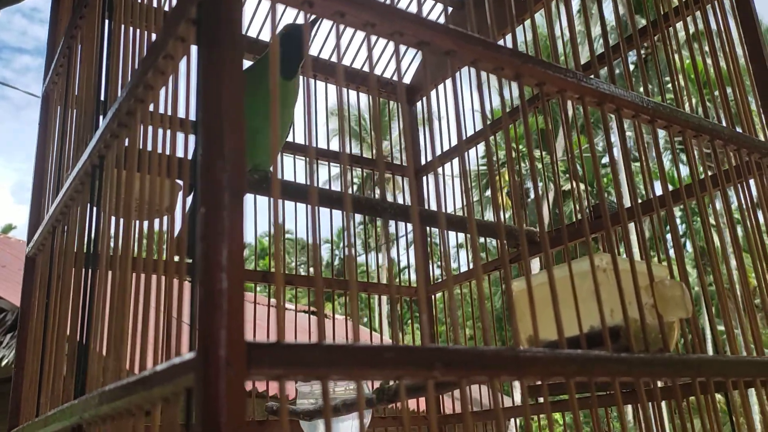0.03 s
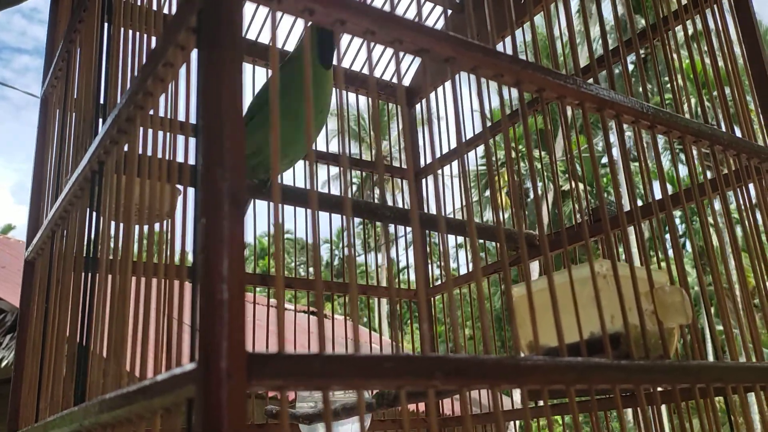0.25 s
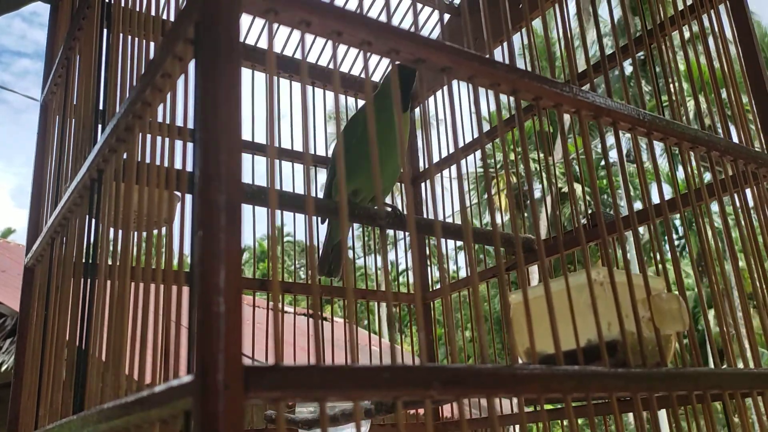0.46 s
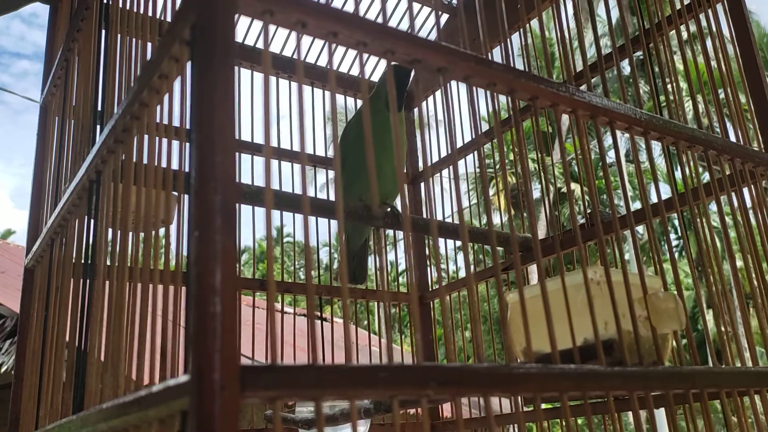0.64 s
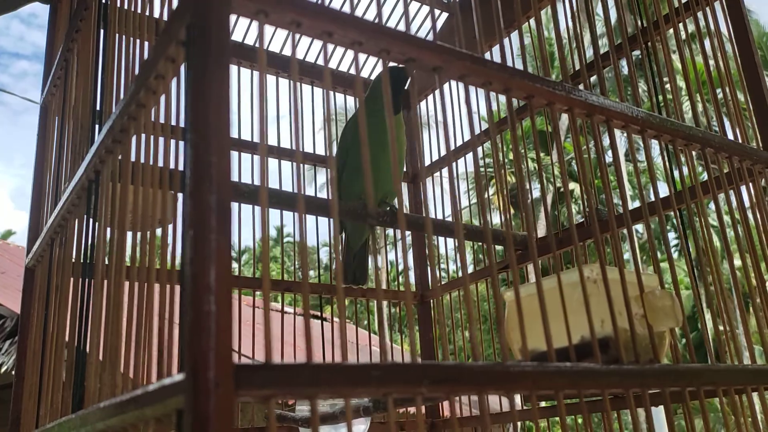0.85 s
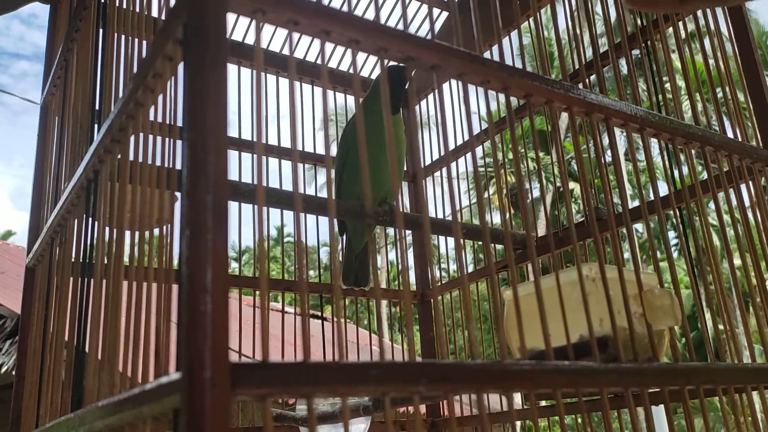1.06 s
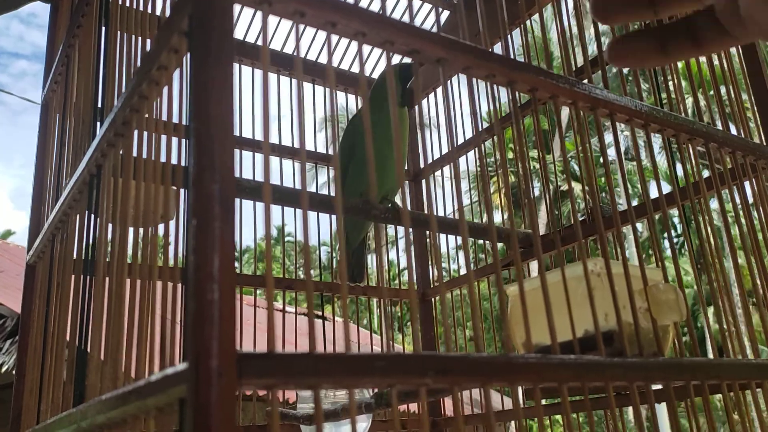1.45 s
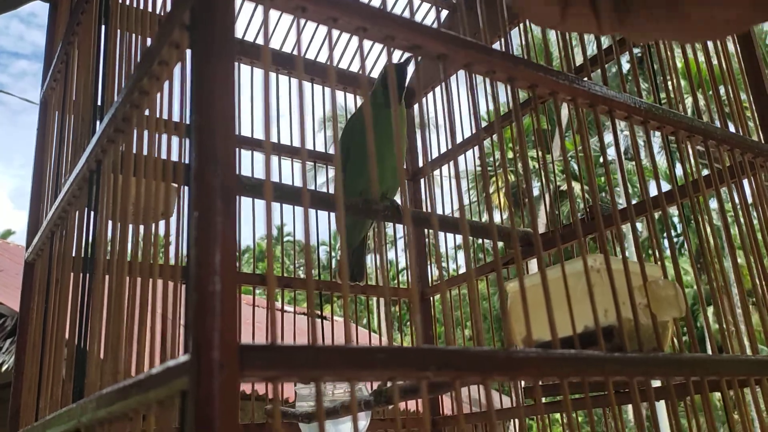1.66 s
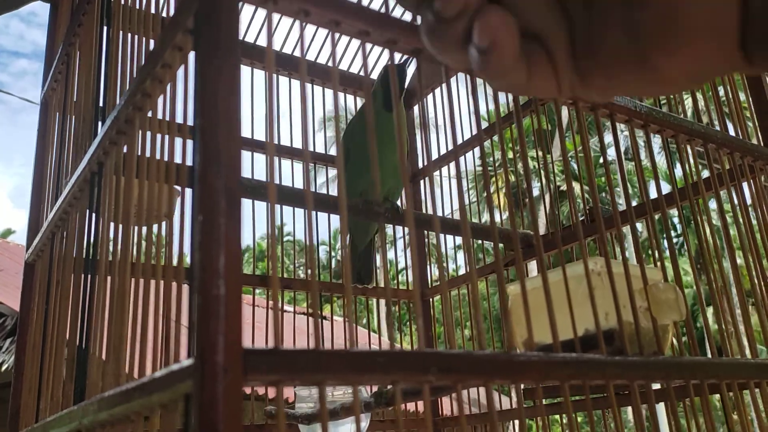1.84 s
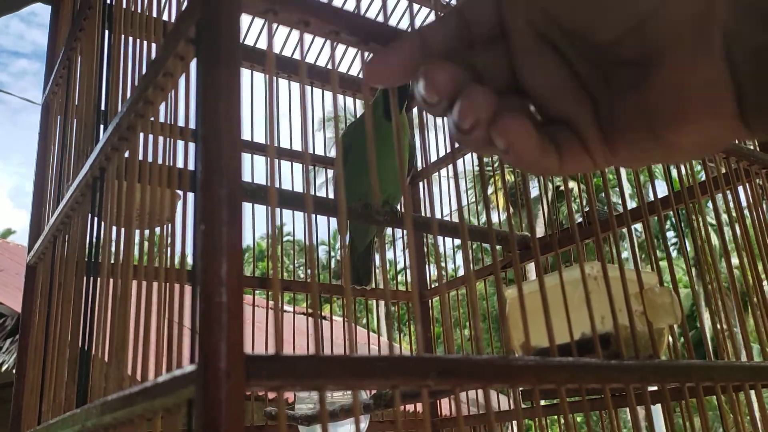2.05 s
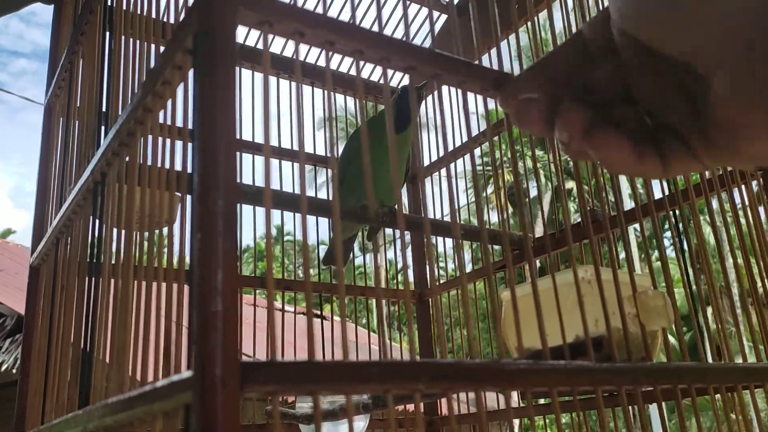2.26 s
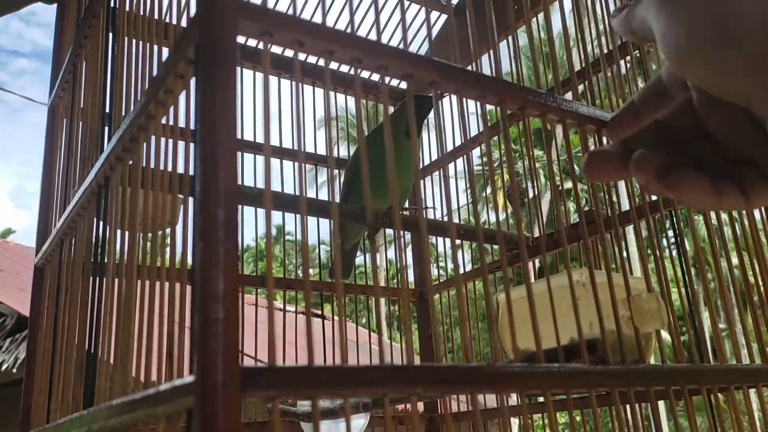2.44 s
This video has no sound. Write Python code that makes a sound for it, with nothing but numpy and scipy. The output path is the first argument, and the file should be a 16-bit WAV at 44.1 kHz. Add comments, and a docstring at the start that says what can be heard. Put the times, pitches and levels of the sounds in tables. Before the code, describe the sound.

A caged songbird close by gives four loud, whistled, slightly distorted squawks between 0.2 and 0.9 seconds. Two more follow until 1.4 seconds, the first softer, under a fast high trill. A thin echo and faint distant chirps last until 1.8 seconds, then comes a short buzzy note. A few dry flaps or snaps sound around 2.2 seconds. Soft outdoor hiss and a low motor hum lie underneath.

```python
"""A caged songbird outdoors gives six loud, close squawks, the last two under a fast high trill.
Each is a nearly pure whistle with rasp at pitch leaps and a rough, high edge of overload distortion
at its peak. A beak click falls among them. A thin lingering echo and faint distant chirps follow,
then a buzzy note and a few dry flaps or snaps.
The yard throws the notes back over a low motor hum and hiss; a limiter holds the loudest notes."""
import sys
import numpy as np
from scipy import signal
from scipy.fft import rfft, irfft
from scipy.io import wavfile
from scipy.ndimage import uniform_filter1d, minimum_filter1d

SR = 44100
rng = np.random.default_rng(int(sys.argv[2]) if len(sys.argv) > 2 else 0)


def wrap_up_sound(samples):
    """Save the sound to the file named by the first command line argument, as 16-bit audio."""
    columns = np.atleast_2d(samples).T
    # keep every value between -1 and 1, then stretch to whole-number steps
    tamed = np.clip(columns, -1, 1)
    steps = np.round(tamed * 32767).astype(np.int16)
    wavfile.write(sys.argv[1], SR, steps)


N = 110250

# One curve per squawk. Each row: time in seconds, pitch in Hz, level in dB.
SQUAWK_1 = [(0.201, 1595, -34.5), (0.215, 1644, -20), (0.234, 1764, -22.5), (0.239, 1992, -5),
            (0.243, 2357, -9.5), (0.26, 2311, -0.5), (0.282, 2313, 4.5), (0.295, 2302, -19),
            (0.307, 2370, -21)]
SQUAWK_2 = [(0.403, 1792, -33.5), (0.423, 1633, -35), (0.434, 1903, -15.5), (0.44, 2000, -12),
            (0.446, 2484, -3.5), (0.453, 2509, -18), (0.468, 2415, -15), (0.474, 2445, 1),
            (0.495, 2453, -21.5)]
SQUAWK_3 = [(0.557, 1658, -39.5), (0.572, 1803, -27.5), (0.583, 2080, -8.5), (0.595, 2403, -12),
            (0.604, 2478, -1), (0.633, 2393, -11), (0.665, 2256, -6), (0.679, 2252, -21),
            (0.696, 2104, -22)]
SQUAWK_4 = [(0.777, 1977, -31), (0.793, 2232, -15), (0.802, 2267, -4.5), (0.818, 2317, -0.5),
            (0.851, 2388, -3.5), (0.876, 2387, -1), (0.893, 2356, 3.5), (0.91, 2310, -9),
            (0.917, 2170, -25.5)]
SQUAWK_5 = [(1.009, 1555, -34), (1.025, 1591, -21), (1.06, 1551, -15.5), (1.081, 1595, -14.5),
            (1.101, 1662, -33), (1.134, 1701, -16), (1.151, 1660, -33)]
SQUAWK_6 = [(1.27, 2114, -36.5), (1.287, 2187, -17), (1.301, 2236, -8.5), (1.325, 2252, -6.5),
            (1.344, 2253, -2.5), (1.364, 2252, -21), (1.378, 2278, -20.5)]
# Tone per squawk. Each row: distortion and rasp gain in dB, right-channel lag in seconds,
# pan in dB (always left minus right), yard send in relative dB.
SQUAWK_TONES = [(8.5, .00007, 5.5, -3.5), (4.5, -.00007, 5.5, 6.5), (1.5, -.00003, 7.5, 3),
                (0.5, 0.011, 10.5, -3), (-10.5, .00026, 3, -3), (-0.5, -.00018, 12.5, 1.5)]
# Overload distortion. Each row: frequency in Hz, left and right gain in dB.
OVERLOAD_SPECTRUM = [(3400, -32.5, -27.5), (5930, -51.5, -45), (7090, -60, -39), (9600, -45.5, -53),
                     (12200, -38, -52.5), (13700, -29, -48)]
# Rasp. Each row: frequency in Hz, relative level in dB.
RASP_SPECTRUM = [(1000, -33), (2750, 7.5), (3500, -16.5), (8500, -26.5), (13500, -11.5)]
# Trill. Each row: start and length in seconds, top pitch and plunge depth in Hz, level in dB.
TRILL_NOTES = [(0.956, 0.022, 5330, 498, -29.5), (1.016, 0.027, 5815, 1840, -28.5),
               (1.076, .037, 5850, 1620, -26.5), (1.146, 0.042, 5870, 1930, -28.5),
               (1.21, .036, 6070, 2200, -26.5), (1.265, 0.051, 6110, 2720, -29.5),
               (1.327, 0.029, 6090, 1430, -26.5)]
# Buzzes. Each row: start and length in seconds, first and last pitch in Hz, warble depth in Hz,
# level and pan in dB.
BUZZ_NOTES = [(0.881, 0.028, 4420, 4440, 300, -37.5, -8), (1.863, 0.106, 6060, 6035, 88.5, -36.5, -9.5)]
# Sliding tones. Each row: start and length in seconds, first and last pitch in Hz, level in dB.
UNDERTONE_GLIDES = [(0.284, 0.05, 2105, 1820, -26), (0.608, .078, 2227, 1903, -20)]
RING_AND_CHIRPS = [(0.001, 0.033, 5530, 5330, -47), (0.819, 0.012, 3095, 3440, -24),
                   (0.837, 0.014, 3250, 3240, -46), (1.956, 0.0093, 6295, 5710, -31.5),
                   (1.969, 0.0094, 4330, 3780, -33)]
ECHO_AND_FAR_CHIRPS = [(1.479, 0.19, 4610, 4410, -51), (1.633, 0.012, 2210, 2470, -30.5),
                       (1.643, 0.0066, 2750, 2950, -35.5), (1.659, 0.023, 1413, 1300, -37.5),
                       (1.71, 0.0086, 2310, 2430, -32), (1.737, 0.028, 1430, 1410, -36.5),
                       (1.792, 0.012, 2345, 2770, -34)]
# A beak click, then snaps. Each row: start and length in seconds (decay starts halfway), level in dB.
DRY_SNAPS = [(.538, .003, -37), (2.164, 0.004, -32), (2.214, 0.0064, -28.5), (2.2495, 0.0091, -23.5),
             (2.287, 0.016, -25), (2.321, .004, -34)]
# Their spectrum. Each row: frequency in Hz, relative level in dB.
SNAP_SPECTRUM = [(300, -5), (700, -1), (2200, 4), (6500, -1.5), (9000, -11), (13500, -1.5)]
# Low bump. One row: length in seconds, first and last pitch in Hz, level in dB.
BUMP_GLIDE = (.035, 300.5, 265, -39.5)
# Roof and near walls. Each row: delay in seconds, left and right gain in dB.
REFLECTIONS = [(.0105, -22, -14), (.045, -25, -18)]
# Rumble and hiss. Each row: frequency in Hz, relative density in dB.
AIR_SPECTRUM = [(25, -37), (55, -17), (118, -4.5), (330, -9.5), (709, -16), (1500, -14), (4500, -20.5),
                (10000, -36.5), (13500, -32)]
# Their width. Each row: frequency in Hz, left-right coherence from 0 to 1.
AIR_COHERENCE = [(150, 0.97), (700, 0.26), (4000, 0)]
# Their balance. Each row: frequency in Hz, pan in dB.
AIR_PAN = [(500, 0.5), (5000, -8.5), (14000, 1.5)]
# Motor hum. Each row: frequency in Hz, level before the swell in dB.
MOTOR_TONES = [(118.4, -57)]
# Its swell. Each row: time in seconds, gain in dB.
MOTOR_SWELL = [(.9, -19.5), (1.6, 7)]

JITTER_DEPTH, JITTER_HZ = 0.0055, 358
BAND_LIMIT_HZ = 14400


def squawks(fade_s=0.0054, leap_hz_per_s=21000, rasp_db=-46.5):
    """Nearly pure whistles. Returns notes, rough edge (distortion, rasp) and mono yard send."""
    notes, edge, rasp_envelope = np.zeros((3, 2, N))
    thrown = np.zeros((1, N))
    curves = [SQUAWK_1, SQUAWK_2, SQUAWK_3, SQUAWK_4, SQUAWK_5, SQUAWK_6]
    for curve, (edge_db, lag_s, pan_db, send_db) in zip(curves, SQUAWK_TONES):
        t = np.arange(curve[0][0] - fade_s, curve[-1][0] + fade_s, 1 / SR)
        hz = uniform_filter1d(along(curve, t), size=120)
        level_db = along(curve, t, axis=2)
        gate = np.clip(np.minimum(t - t[0], t[-1] - t) / fade_s, 0, 1)
        phase = phase_of(hz) - 2 * np.pi * hz * np.array([[0], [lag_s]])
        note = np.sqrt(2) * gate * amp(level_db) * np.sin(phase)
        add(notes, t[0], pan(pan_db) * note)
        add(thrown, t[0], amp(send_db) * note[:1])
        sag_db = 0.21 * np.minimum(level_db - np.percentile(level_db, 70), 0)
        leap = abs(np.gradient(hz)) * SR / leap_hz_per_s
        add(edge, t[0], gate * overload(hz, phase, edge_db, sag_db, leap))
        add(rasp_envelope, t[0], pan(0) * gate * amp(edge_db + 2 * sag_db) * (1 + 2 * np.sqrt(leap)))
    notes += undertones()
    rasp = coloured(rasp_envelope * rng.standard_normal((2, N)), RASP_SPECTRUM)
    return notes, edge + amp(rasp_db) * rasp, thrown


def overload(hz, phase, gain_db, sag_db, leap, flutter_db=3.5, flutter_hz=109, blur_rad=0.5):
    """Distortion as wavering harmonics 2-8. Off the note's peak they sink, the high ones fastest."""
    out = np.zeros_like(phase)
    for k in range(2, 9):
        colour = amp([across(OVERLOAD_SPECTRUM, k * hz, axis=side) for side in (1, 2)])
        colour *= k * hz < BAND_LIMIT_HZ
        level_db = gain_db + k * sag_db + flutter_db * wander(len(hz), flutter_hz)
        harmonic = np.sin(k * phase + blur_rad * wander(len(hz), JITTER_HZ))
        out += amp(level_db) / np.sqrt(2 + leap) * colour * harmonic
    return out


def undertones():
    """The other side of the syrinx slides down under the note."""
    return glides(UNDERTONE_GLIDES, pan_db=0, octave_db=-36)


def trill(hook_hz=1190, hook_s=0.0035, plunge_s=0.0022, waver_depth_hz=45):
    """Fast high notes, each an upward hook, a held top and a plunge."""
    out = np.zeros((2, N))
    for start_s, length_s, top_hz, plunge_hz, db in TRILL_NOTES:
        t = np.arange(0, length_s, 1 / SR)
        hz = top_hz - hook_hz * np.exp(-t / hook_s) - plunge_hz * np.exp((t - length_s) / plunge_s)
        hz += waver_depth_hz * wander(len(t), 210)
        add(out, start_s, peep(hz, db, pan_db=-11.5, octave_db=-22.5, taper=0.44))
    return out


def buzzes(warble_hz=114):
    """Notes roughened by a fast, uneven pitch warble."""
    out = np.zeros((2, N))
    for start_s, length_s, from_hz, to_hz, depth_hz, db, pan_db in BUZZ_NOTES:
        t = np.arange(0, length_s, 1 / SR)
        warble = np.sin(2 * np.pi * warble_hz * t + 2.5 * wander(len(t), 84))
        hz = np.linspace(from_hz, to_hz, len(t)) + depth_hz * warble
        add(out, start_s, peep(hz, db, pan_db, octave_db=-10.5, taper=0.4))
    return out


def ring_and_chirps():
    """A faint, high fading ring at the start, then small sliding chirps."""
    return glides(RING_AND_CHIRPS, pan_db=-10.5, octave_db=-14)


def dry_snaps(rise_s=0.00086, fall_s=0.0049, grain_db=2, rustle_start_s=2.28, rustle_db=-44.5):
    """Grainy noise bursts: a beak click, then dry flaps or snaps ending in a light rustle."""
    t = np.arange(N) / SR
    envelope = amp(rustle_db) * (t > rustle_start_s)
    for start_s, length_s, db in DRY_SNAPS:
        attack = np.clip((t - start_s) / rise_s, 0, 1)
        decay = np.exp(-np.maximum(t - start_s - length_s / 2, 0) / fall_s)
        envelope += amp(db) * attack * decay
    roughness = unit(uniform_filter1d(rng.standard_normal(N), size=30))
    grain = unit(amp(grain_db * roughness))
    return coloured(envelope * grain * rng.standard_normal((2, N)), SNAP_SPECTRUM)


def echo_and_far_chirps(scatter_s=0.012):
    """A thin lingering echo, then faint distant chirps, smeared by foliage."""
    direct = glides(ECHO_AND_FAR_CHIRPS, pan_db=-6.5)
    t = np.arange(0, 10 * scatter_s, 1 / SR)
    paths = rng.standard_normal((2, len(t))) * np.exp(-t / scatter_s)
    scattered = signal.fftconvolve(direct, paths / np.linalg.norm(paths[0]), axes=1)[:, :N]
    return direct + 0.57 * scattered


def bump(start_s=1.118):
    """A soft, low falling tone."""
    return glides([(start_s, *BUMP_GLIDE)], pan_db=-1)


def near_echoes(x):
    """Distinct reflections off the roof and walls."""
    out = np.zeros((2, N))
    for delay_s, left_db, right_db in REFLECTIONS:
        add(out, delay_s, amp([[left_db], [right_db]]) * x)
    return out


def far_wall(x, delay_s=0.12, gain_db=-31, pan_db=-17.5):
    """One late reflection from the right."""
    out = np.zeros((2, N))
    add(out, delay_s, amp(gain_db) * pan(pan_db) * x)
    return out


def yard_reverb(x, t60_s=0.35, taps_per_s=3000, predelay_s=0.004):
    """A diffuse dying tail of sparse reflections."""
    t = np.arange(SR) / SR
    taps = rng.standard_normal((2, SR)) * (rng.random((2, SR)) < taps_per_s / SR)
    tail = taps * (t > predelay_s) * amp(-60 * t / t60_s)
    return signal.fftconvolve(x, tail / np.linalg.norm(tail, axis=1, keepdims=True), axes=1)[:, :N]


def air(level_db=-41):
    """Outdoor noise: centred rumble, wide hiss."""
    hz = np.fft.rfftfreq(N, 1 / SR)
    left, independent = rfft(rng.standard_normal((2, N)))
    coherence = across(AIR_COHERENCE, hz)
    right = coherence * left + np.sqrt(1 - coherence ** 2) * independent
    spectrum = np.array([left, right]) * amp(across(AIR_SPECTRUM, hz)) * pan(across(AIR_PAN, hz))
    return amp(level_db) * unit(irfft(spectrum, N))


def motor_hum(drift_depth=0.028):
    """A distant motor, swelling and wavering in pitch."""
    t = np.arange(N) / SR
    speed = 1 + drift_depth * np.interp(t, np.linspace(0, t[-1], SR), wander(SR, 29))
    hum = sum(amp(db) * np.sin(2 * np.pi * np.cumsum(hz * speed) / SR) for hz, db in MOTOR_TONES)
    return np.sqrt(2) * amp(along(MOTOR_SWELL, t)) * hum


def glides(rows, pan_db, octave_db=-np.inf):
    """One straight pitch slide per row."""
    out = np.zeros((2, N))
    for start_s, length_s, from_hz, to_hz, db in rows:
        hz = np.linspace(from_hz, to_hz, int(length_s * SR))
        add(out, start_s, peep(hz, db, pan_db, octave_db))
    return out


def peep(hz, db, pan_db, octave_db, taper=0.51, octave_pan_db=13):
    """A rounded tone on a pitch curve, with its octave."""
    phase = phase_of(hz)
    swell = np.sin(np.linspace(0, np.pi, len(hz))).clip(0) ** taper
    octave = amp(octave_db) * swell ** 2 * pan(octave_pan_db) * np.sin(2 * phase)
    return np.sqrt(2) * amp(db) * swell * (pan(pan_db) * np.sin(phase) + octave)


def phase_of(hz):
    """Phase of a slightly unsteady pitch."""
    return 2 * np.pi * np.cumsum(hz * (1 + JITTER_DEPTH * wander(len(hz), JITTER_HZ))) / SR


def wander(n, rate_hz):
    """Smooth random motion, rms about 1."""
    hz = np.fft.rfftfreq(SR, 1 / SR)
    return unit(irfft(rfft(rng.standard_normal(SR)) * np.exp(-(hz / rate_hz) ** 2)))[:n]


def coloured(x, spectrum):
    """Filters by a spectrum, keeping the power of white noise."""
    gain = unit(amp(across(spectrum, np.fft.rfftfreq(N, 1 / SR))))
    return irfft(rfft(x) * gain, N)


def amp(db):
    """Decibels to gain."""
    return 10 ** (np.asarray(db) / 20)


def unit(x):
    """Scales to rms 1."""
    return x / np.sqrt(np.mean(x ** 2) + 1e-20)


def along(points, t, axis=1):
    """One column of a curve at times t."""
    rows = np.array(points, float)
    return np.interp(t, rows[:, 0], rows[:, axis])


def across(points, hz, axis=1):
    """One column of a spectrum, interpolated in log frequency."""
    rows = np.array(points, float)
    return np.interp(np.log(hz + 1), np.log(rows[:, 0] + 1), rows[:, axis])


def pan(db):
    """Constant-power gains for a left-minus-right level."""
    half_db = np.atleast_1d(db) / 2
    gains = amp([half_db, -half_db])
    return gains / np.sqrt((gains ** 2).mean(0))


def add(mix, start_s, sound):
    """Mixes a sound in place."""
    part = mix[:, max(round(start_s * SR), 0):][:, :sound.shape[1]]
    part += sound[:, :part.shape[1]]


def scene():
    """The bird close by, the yard around it."""
    notes, edge, thrown = squawks()
    twitter = trill() + buzzes() + ring_and_chirps()
    snaps = dry_snaps()
    far = echo_and_far_chirps() + bump()
    near = notes + twitter + snaps
    send = amp(-17) * thrown + amp(-1) * twitter + amp(-8.5) * snaps + amp(-6) * far
    reflected = near_echoes(near) + far_wall(thrown) + yard_reverb(send)
    return near + edge + far + reflected + air() + motor_hum()


def record(dry, ceiling_db=-3.2, window_s=0.005):
    """A fast limiter per channel, then a low-pass."""
    size = int(window_s * SR)
    max_gain = np.minimum(amp(ceiling_db) / (abs(dry) + 1e-9), 1)
    gain = uniform_filter1d(minimum_filter1d(max_gain, size, axis=1), size, axis=1)
    lowpass = signal.firwin(301, BAND_LIMIT_HZ, window=("kaiser", 8), fs=SR)
    return signal.oaconvolve(dry * gain, lowpass[None], "same")


dry = scene()
out = record(dry)
wrap_up_sound(out)
```